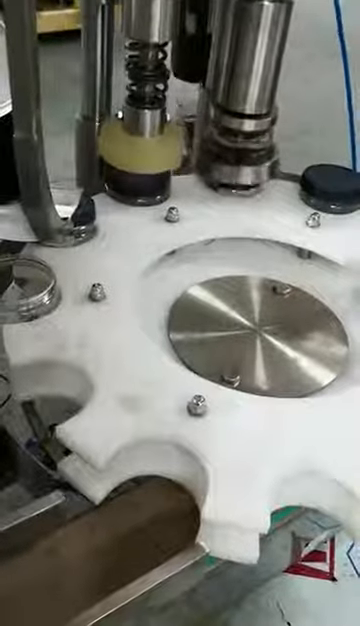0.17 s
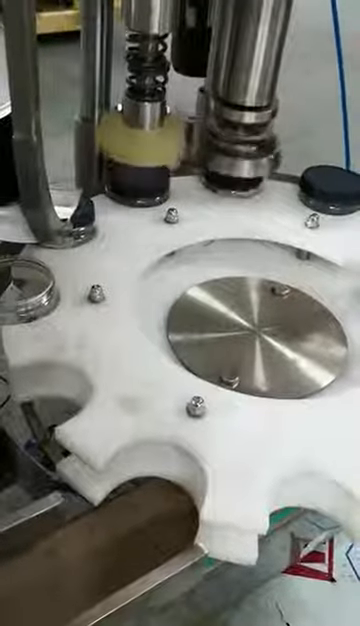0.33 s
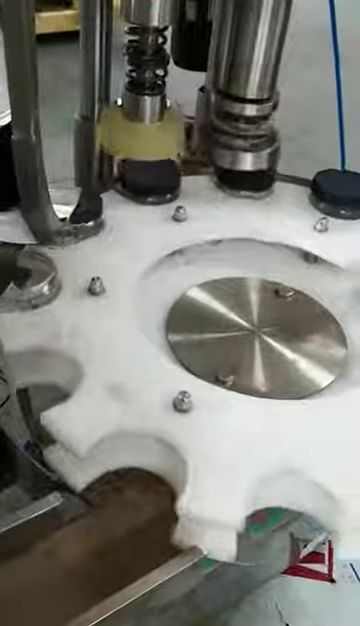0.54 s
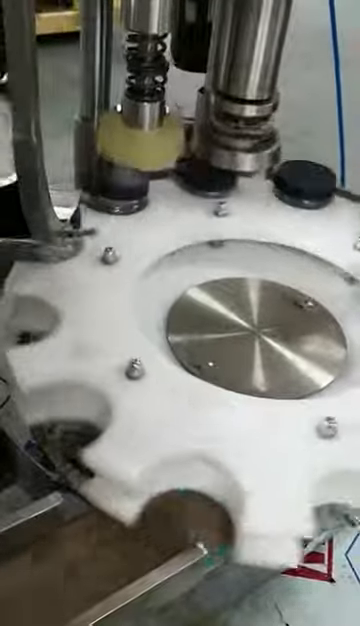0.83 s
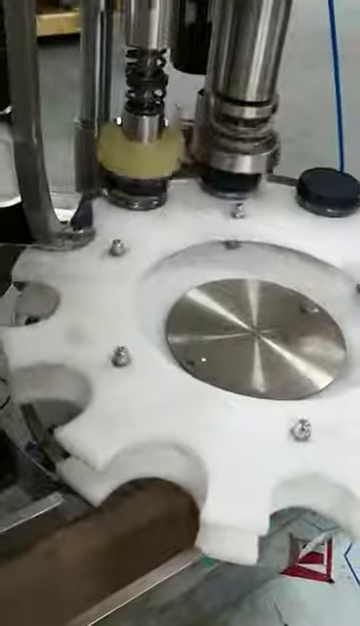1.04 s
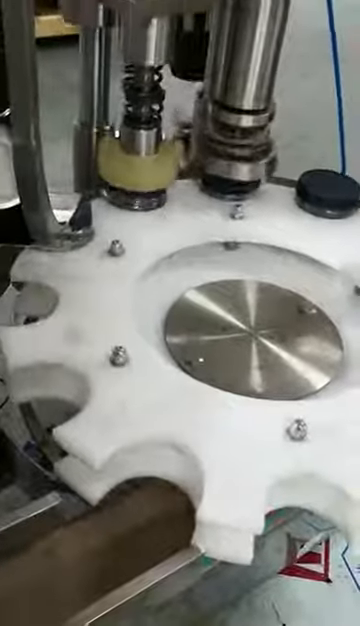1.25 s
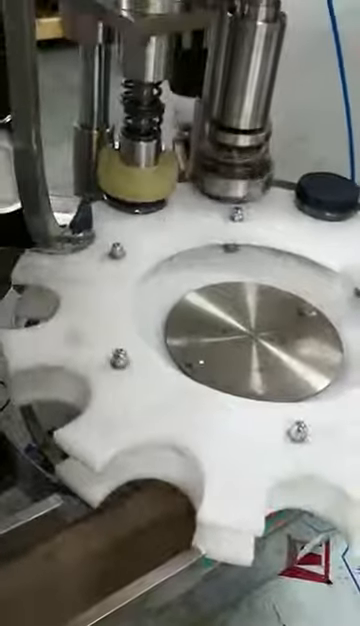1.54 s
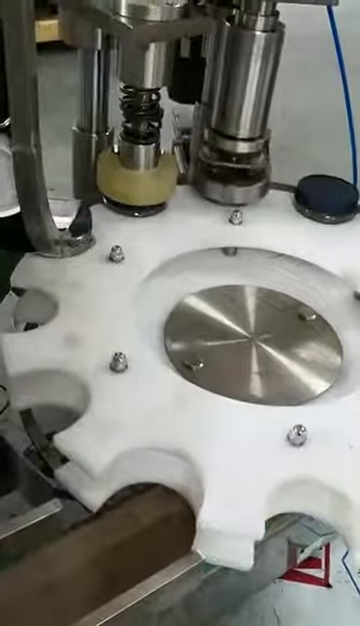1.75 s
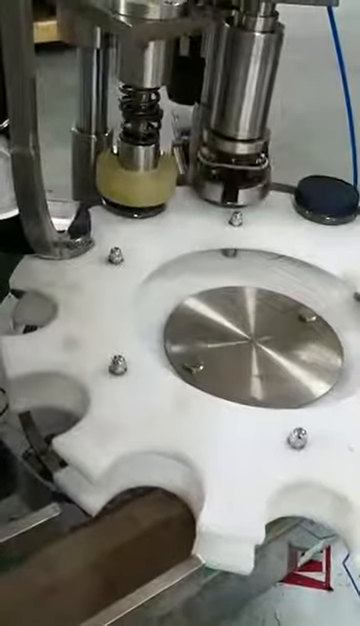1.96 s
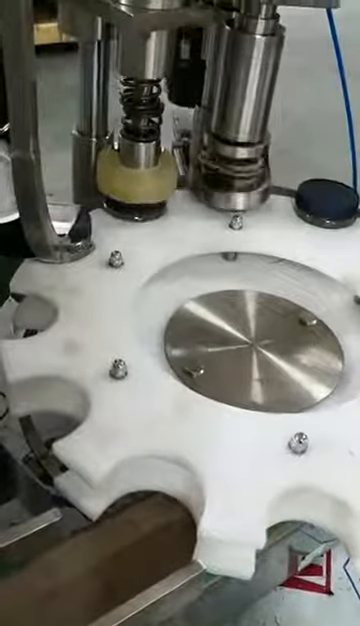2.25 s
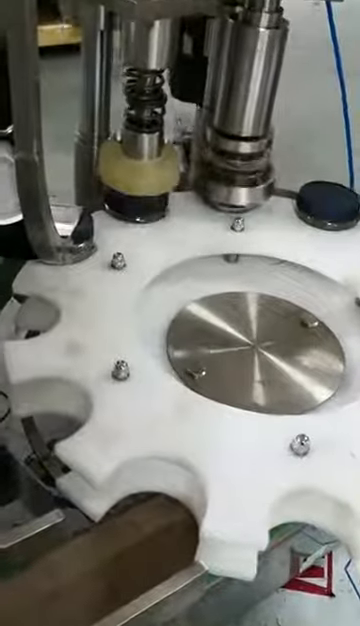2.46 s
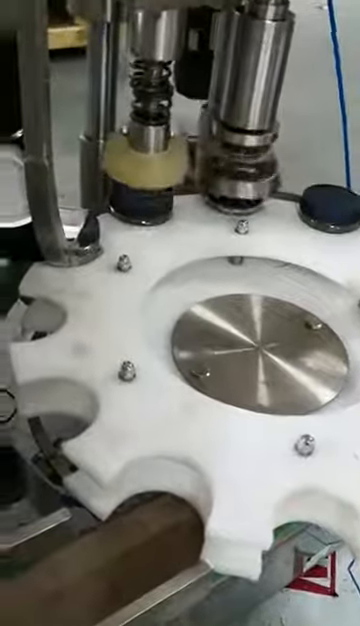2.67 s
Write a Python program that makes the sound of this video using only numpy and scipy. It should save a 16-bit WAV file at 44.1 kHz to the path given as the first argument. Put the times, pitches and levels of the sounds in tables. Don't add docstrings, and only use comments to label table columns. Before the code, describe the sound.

A capping machine runs through one cycle: plastic clatter, scraping wheel, sharp metal slam, air bursts

```python
import sys
import numpy as np
from scipy import signal
from scipy.fft import rfft, irfft
from scipy.io import wavfile
from scipy.ndimage import uniform_filter1d

SR = 44100
rng = np.random.default_rng(int(sys.argv[2]) if len(sys.argv) > 2 else 0)


def log_audio(samples):
    frames = np.atleast_2d(samples).T
    limited = np.clip(frames, -1, 1)
    pcm = np.round(limited * 32767).astype(np.int16)
    wavfile.write(sys.argv[1], SR, pcm)


def magnitude_from_level(level_db):
    exponent = np.asarray(level_db, float) / 20
    return 10 ** exponent


N = 123921


def evened(x):
    return x / np.sqrt(np.mean(x ** 2) + 1e-20)


def read(points, hz):
    f, value = np.transpose(points)
    return np.interp(np.log(hz + 1), np.log(f + 1), value)


def curve(points, outside=None):
    t, value = np.transpose(points)
    return np.interp(np.arange(N) / SR, t, value, outside, outside)


def add(mix, s, sound):
    part = mix[round(s * SR):][:len(sound)]
    part += sound[:len(part)]


def resonate(x, hz, width):
    turn = np.exp(2j * np.pi * hz * np.arange(x.shape[-1]) / SR)
    r = np.exp(-np.pi * width / SR)
    return 2 * (turn * signal.lfilter([1 - r], [1, -r], x / turn)).real


def ring(hz, db, t60, t):
    return magnitude_from_level(db - 60 * t / t60) * np.sin(2 * np.pi * hz * t)


def coloured(points):
    spectrum = rfft(rng.standard_normal(N))
    return evened(irfft(spectrum * magnitude_from_level(read(points, np.fft.rfftfreq(N, 1 / SR))), N))


# f/Hz, level/dB per Hz
ROAR_SPECTRUM = [(20, -19), (100, -11.5), (165, -10), (195, -2), (250, -14.5), (330, -6), (520, -18),
                 (1200, -16)]
# f/Hz, level/dB per Hz
HISS_SPECTRUM = [(1200, -5.5), (1500, -3), (1610, -6.5), (2070, 1), (2880, -4), (3800, -8.5), (4060, -5.5),
                 (4300, -12), (5270, -4.5), (7500, -7), (9750, -58)]
ROAR_DB, HISS_DB = -38, -34.5
ROAR_FOLLOWS = 0.23
# t/s, hiss level/dB
AIR_DRAW = [
    (0, 0),
    (.55, -1),
    (1.3, 2),
    (1.55, 2.5),
    (2, 2),
    (2.35, 0.5),
    (2.81, -1),
]
# f/Hz, coherence (0-1)
COHERENCE = [(60, .92), (200, .9), (420, .4), (800, .1), (1600, .4), (2700, .2), (4000, .35), (6000, .05)]
SHOP_LAG_S = .000635
# f/Hz, level/dB
PATCHINESS = [(150, 2), (600, 4.5), (1300, 3), (2500, 3), (4000, 2), (7000, 2.96)]


def shop():
    hop, size = 256, 1024
    frames, hz = N // hop + 9, np.fft.rfftfreq(size, 1 / SR)
    a, b, c, d, patches = rng.standard_normal((frames, 513, 5)).T
    patches = uniform_filter1d(patches, size=5, axis=0)
    patches = evened(uniform_filter1d(patches, size=6, axis=1))
    flicker = evened(uniform_filter1d(rng.standard_normal(frames), size=3))

    at = np.minimum(np.arange(-2, frames - 2).clip(0) * hop, N - 1)
    pull_db, draw_db = curve(MOTOR_PULL)[at], curve(AIR_DRAW)[at]
    low = hz < 1200
    roar = evened(low * magnitude_from_level(read(ROAR_SPECTRUM, hz)))[:, None]
    hiss = evened(~low * magnitude_from_level(read(HISS_SPECTRUM, hz)))[:, None]
    roar_gain = magnitude_from_level(ROAR_DB + ROAR_FOLLOWS * (pull_db - pull_db.mean()))
    shape = roar_gain * roar + magnitude_from_level(HISS_DB + draw_db) * hiss

    same = np.clip(read(COHERENCE, hz), 0, 1)[:, None]
    left = a + 1j * b
    lag = np.exp(-2j * np.pi * hz * SHOP_LAG_S * (hz > 350))[:, None]
    right = same * left * lag + np.sqrt(1 - same ** 2) * (c + 1j * d)
    drift = magnitude_from_level(read(PATCHINESS, hz)[:, None] * patches + 0.19 * flicker)
    z = np.array([left, right]) * shape * drift
    x = signal.istft(z, nperseg=size, noverlap=size - hop)[1][:, :N]
    return magnitude_from_level(2.5) * np.hypot(magnitude_from_level(ROAR_DB), magnitude_from_level(HISS_DB)) * evened(x)


# t/s, level/dB
MOTOR_PULL = [(0, -41.5), (.15, -42), (.63, -42.5), (.76, -37.5), (.83, -59), (1.0, -46.5), (1.2, -43),
              (1.38, -39.5), (1.6, -45.5), (1.71, -41.5), (2.15, -36), (2.38, -42), (2.6, -41.5),
              (2.81, -45)]
HUM_HZ, HUM_WIDTH = 200.5, 16
# t/s, level/dB, level of upper modes/dB
CAM_THUMPS = [(0.077, -16.5, -5), (0.106, -19, -16), (0.681, -36.5, 3), (1.2234, -19, 2.5),
              (1.238, -35, 13), (1.259, -28, 0.5), (1.294, -30.5, 7.5), (1.392, -33.5, 7.5),
              (1.429, -35, 9), (2.211, -16, -3), (2.254, -23, -9), (2.272, -34, 5), (2.444, -25.5, 3.5),
              (2.465, -19, -2), (2.5, -25.5, -3.5)]
# f/Hz, level/dB, t60/s
FRAME_MODES = [(210.5, -4, 0.35), (233.6, -1, 0.15), (270, -2.5, 0.16), (320.5, -3.5, 0.21),
               (346.4, -2.5, 0.042), (384, -6, 0.092)]


def frame():
    hum = resonate(resonate(rng.standard_normal(N), HUM_HZ, HUM_WIDTH), HUM_HZ, 31)
    steady = hum / np.sqrt(abs(uniform_filter1d(hum ** 2, size=3500)) + 1e-12)
    out = magnitude_from_level(curve(MOTOR_PULL)) * evened(steady)
    t = np.arange(.4 * SR) / SR
    detunes = rng.uniform(0.95, 1.01, (len(CAM_THUMPS), len(FRAME_MODES)))
    for (s, db, upper_db), detune in zip(CAM_THUMPS, detunes):
        modes = 0
        for k, ((hz, mode_db, t60), d) in enumerate(zip(FRAME_MODES, detune)):
            modes = modes + ring(hz * d, mode_db + upper_db * (k > 0), t60, t)
        add(out, s, magnitude_from_level(db - 1.5) * np.minimum(t / 0.0047, 1) * modes)
    return out


# t/s, level/dB, low mode f/Hz, high mode f/Hz, high mode level/dB
PLASTIC_KNOCKS = [(.096, -35, 873, 2350, 14), (.552, -29, 1415, 2320, 8), (.582, -26.5, 712, 2500, -5),
                  (.7215, -31, 1700, 2610, 1.5), (.729, -32, 1700, 2280, 15), (.7355, -28, 1700, 2330, 14),
                  (0.7624, -22, 1700, 2330, 13), (.769, -36, 1700, 2460, 13), (.785, -45, 1790, 3700, 17.5),
                  (.791, -34.5, 1800, 3760, 14), (0.801, -35, 1800, 3733, 21.5),
                  (0.813, -17.5, 1725, 2850, 5.5), (.819, -18.5, 2300, 2810, 4.5),
                  (0.8239, -13, 1794, 2800, -3.5), (1.2115, -21, 788, 2070, -4),
                  (1.2135, -16, 870, 2070, -1.5), (1.218, -15.5, 2400, 1630, -11.5),
                  (1.3079, -15, 704, 2014, -5), (1.3077, -28, 2440, 3620, -4.5),
                  (1.693, -20, 2300, 2775, -7), (1.7, -19.5, 726, 2220, 8), (1.409, -18, 1324, 2260, -4),
                  (1.412, -13, 2240, 3300, -4.5), (1.417, -20.5, 2310, 1450, 0),
                  (1.4221, -14, 2400, 3334, 2), (1.4265, -13.5, 3024, 5000, -7)]
KNOCK_RISE_S, KNOCK_T60 = .003, .03
ROUGH, HIGH_WIDTH = .4, 400
CRACK_DB, CRACK_HZ, CRACK_WIDTH = -6.5, 1700, 1600


def knocks():
    out, t = np.zeros(N), np.arange(2000) / SR
    shape = np.minimum(t / KNOCK_RISE_S, 1) ** 2 * magnitude_from_level(-60 * t / KNOCK_T60)
    noises = rng.standard_normal((len(PLASTIC_KNOCKS), len(t)))
    for (s, db, low_hz, high_hz, high_db), noise in zip(PLASTIC_KNOCKS, noises):
        hollow = np.sin(2 * np.pi * low_hz * t)
        hard = np.sin(2 * np.pi * high_hz * t) + ROUGH * evened(resonate(noise, high_hz, HIGH_WIDTH))
        crack = resonate(noise[::-1], CRACK_HZ, CRACK_WIDTH)
        crack = evened(resonate(crack, CRACK_HZ, CRACK_WIDTH))
        add(out, s, magnitude_from_level(db + 6.0) * shape * (hollow + magnitude_from_level(high_db) * hard + magnitude_from_level(CRACK_DB) * crack))
    return out


# t/s, level/dB
WHEEL_CREEP = [
    (.44, -38.5),
    (.5, -29.5),
    (.53, -37.5),
    (.555, -41.5),
    (.59, -30.5),
    (.62, -52),
]
# t/s, level/dB
WHEEL_INDEX = [
    (.7, -38),
    (.736, -24),
    (.756, -31),
    (.766, -25.5),
    (.784, -20),
    (.826, -12.5),
    (.832, -19),
    (.87, -27),
    (.95, -37),
]
# f/Hz, width/Hz, level/dB
WHEEL_BODY = [(673, 230, -6), (1453, 280, -7), (1750, 400, 4), (2180, 470, 4), (2400, 340, 3),
              (2680, 310, 1.5), (3070, 140, -12), (3700, 120, -5), (5940, 500, -3.5), (6250, 1300, -11),
              (7130, 560, -1.5)]


def wheel():
    size = magnitude_from_level(3 * np.minimum(rng.exponential(1, N), 3))
    happens = rng.random(N) < 7000 / SR
    slips = size * happens * rng.choice([-1., 1.], N)
    picks = rng.random((len(WHEEL_BODY), N)) < .4
    heard = .5 + 2.4 * rng.choice([-1., 1.], (2, N))
    body = 0
    for (hz, width, db), pick in zip(WHEEL_BODY, picks):
        resonance = resonate(resonate(slips * pick * heard, hz, width), hz, 2 * width)
        body = body + magnitude_from_level(db) * evened(resonance)
    motion = magnitude_from_level(curve(WHEEL_INDEX, outside=-84)) + magnitude_from_level(curve(WHEEL_CREEP, outside=-83))
    return motion * evened(body)


# peak t/s, rise/s, level/dB, t60/s
AIR_PUFFS = [
    (0.737, 0.011, -50.5, 0.043),
    (1.4265, .016, -15.5, 0.096),
    (1.686, .025, -24.5, 0.16),
    (2.206, 0.045, -26, 0.27),
    (2.287, 0.021, -36, 0.083),
    (2.449, 0.078, -33.5, 0.17),
]
# f/Hz, level/dB per Hz
AIR_SPECTRUM = [(240, -29), (400, -10), (877, -13), (1240, -2), (3260, -6.5), (7500, -6.5), (9750, -34.5),
                (16500, -120)]


def air():
    t = np.arange(N) / SR
    flow = 0
    for s, rise, db, t60 in AIR_PUFFS:
        flow = flow + magnitude_from_level(db + np.where(t < s, -20 * (s - t) / rise, -60 * (t - s) / t60))
    sputter = magnitude_from_level(1.5 * evened(uniform_filter1d(rng.standard_normal(N), size=90)))
    shared = coloured(AIR_SPECTRUM)
    jets = np.array([shared + 6.7 * coloured(AIR_SPECTRUM) for _ in "LR"])
    return flow * evened(sputter * jets)


# t/s, level/dB, treble level/dB
HEAD_SLAMS = [
    (1.3822, -32, 2),
    (1.3856, -2, -1.5),
    (1.3895, -24.5, -8.5),
    (1.3943, -20.5, 7.5),
    (1.3969, -18.5, 4.5),
    (1.404, -16, -3.5),
]
# f/Hz, level/dB, t60/s
HEAD_MODES = [(861, -6, .02), (1050, 1, .02), (1250, 3, .02), (1550, 0, .02), (2272, -1, .03),
              (3000, -5, .015), (4100, -2, .011), (4600, 0, .011), (5050, -2, .016), (5750, -5, .018),
              (6858, -7, .02), (7300, -9, .018)]


def slam():
    out, t = np.zeros(N), np.arange(4000) / SR
    for (s, db, treble_db), draw in zip(HEAD_SLAMS, rng.standard_normal((len(HEAD_SLAMS), len(t)))):
        modes = 0
        for (hz, mode_db, t60), d in zip(HEAD_MODES, draw):
            modes = modes + ring(hz * (1 + 0.025 * d), mode_db + treble_db * hz / 4000, t60, t)
        burst = magnitude_from_level(1 - 60 * t / .008) * draw
        add(out, s, magnitude_from_level(db - 7) * np.minimum(t / .0005, 1) * (modes + burst))
    return out


def push():
    peak_s, width_s, db = 1.4295, 0.0018, -11.5
    return -magnitude_from_level(db) * np.exp(-.5 * ((np.arange(N) / SR - peak_s) / width_s) ** 2)


# t/s, whir level/dB over SPIN_DB
CHUCK_SPIN = [
    (1.825, -18),
    (1.844, 7),
    (1.95, -4),
    (1.974, 8.5),
    (2.076, -2),
    (2.104, 10.5),
    (2.18, -6),
    (2.216, 1),
    (2.25, -8),
]
SPIN_HZ, SPIN_WIDTH, SPIN_DB = 850, 70, -40.5
# t/s, length/s, level/dB, f/Hz
CHUCK_SQUEAKS = [
    (1.907, 0.013, -29.5, 5330),
    (1.949, 0.01, -29, 5250),
    (2.018, 0.013, -35, 5400),
    (2.04, .018, -28, 5000),
    (2.063, .01, -36, 5050),
    (2.087, 0.008, -30, 5200),
    (2.176, 0.018, -29, 5100),
]


def chuck():
    t = np.arange(N) / SR
    whir = resonate(rng.standard_normal(N), SPIN_HZ, SPIN_WIDTH)
    whir = evened(resonate(whir, SPIN_HZ, 160))
    steady = whir / np.sqrt(abs(uniform_filter1d(whir ** 2, size=1200)) + 1e-12)
    out = magnitude_from_level(SPIN_DB + curve(CHUCK_SPIN, outside=-60)) * steady
    t = t[:3000]
    noises = rng.standard_normal((len(CHUCK_SQUEAKS), len(t)))
    for (s, length, db, hz), noise in zip(CHUCK_SQUEAKS, noises):
        u = t / length
        wobble = np.cumsum(evened(uniform_filter1d(noise, size=100))) * 70 / SR
        tone = np.sin(2 * np.pi * (hz * t + wobble))
        add(out, s, magnitude_from_level(db + 4.5) * 2 * u * np.exp(-2 * u * u) * tone)
    return out


def ports(x, lean, lag_s=0):
    hz = np.fft.rfftfreq(N, 1 / SR)
    half = magnitude_from_level(read(lean, hz) / 2) * np.exp(1j * np.pi * hz * lag_s)
    return irfft(rfft(x) * np.array([half, 1 / half]), N)


# f/Hz, t60/s
SHOP_T60 = [(200, 0.56), (1500, 1), (7000, 0.15)]


def room(x):
    taps = np.zeros((2, SR // 2))
    at = np.arange(200, SR // 2 - 40, 20)
    jittered = at + rng.integers(0, 20, (2, len(at)))
    np.put_along_axis(taps, jittered, rng.choice([-1., 1.], (2, len(at))), 1)
    hz, t, z = signal.stft(taps, SR, nperseg=256)
    decay = magnitude_from_level(-60 * t / read(SHOP_T60, hz)[:, None])
    tail = signal.istft(z * decay, SR, nperseg=256)[1]
    return signal.fftconvolve(x[None], tail / np.linalg.norm(tail[0]), axes=1)[:, :N]


def scatter(x):
    t60, t = .014, np.arange(1200) / SR
    taps = rng.standard_normal((2, len(t))) * (rng.random((2, len(t))) < .1)
    taps = taps * magnitude_from_level(-60 * t / t60)
    return signal.fftconvolve(x, taps / np.linalg.norm(taps, axis=1)[:, None], axes=1)[:, :N]


# f/Hz, left-right level/dB
NEAR_SHADOW = [(1000, -3.5), (2200, 3), (3300, -5), (5000, 0)]
NEAR_LAG_S, PARTS_DB, SHOP_DB = -.00019, -6, -15


def scene():
    hits, head = knocks() + chuck(), slam()
    near = hits + magnitude_from_level(PARTS_DB) * scatter(hits[None] + .5 * head) + air() + wheel()
    direct = ports(near, NEAR_SHADOW, NEAR_LAG_S) + ports(head, NEAR_SHADOW, 0)
    reverberant = magnitude_from_level(SHOP_DB) * room(near[0] + head)
    return shop() + direct + reverberant + ports(frame() + push(), [(200, -1)], 0.00022)


def band_limit(x):
    return signal.sosfilt(signal.butter(12, 8900, fs=SR, output="sos"), x)


# f/Hz, left-right level/dB
PORT_LEAN = [(300, 0), (600, -2.5), (900, -1.5), (2500, 2), (4800, -3.5), (6000, -5.5), (7450, -18),
             (7900, -12)]
# from t/s, to t/s
TOP_OPEN = [
    (1.378, 1.402),
    (1.42, 1.458),
    (1.911, 1.92),
]
EDGE_HZ, TOP_HZ, SHELF_DB = 7520, 8270, -5


def record(dry):
    dry, t = ports(dry, PORT_LEAN), np.arange(N) / SR
    power_db = 10 * np.log10(abs(uniform_filter1d((dry ** 2).mean(0), size=600)) + 1e-12)
    held_db = np.maximum.accumulate(power_db + 40 * t) - 40 * t
    over_db = np.maximum(held_db + 19.5, 0)
    x = dry / magnitude_from_level(.15 * uniform_filter1d(over_db, size=200))
    x = x / (1 + (x / 1.05) ** 4) ** .25

    def cut(hz):
        taps = signal.firwin(1023, hz, window=("kaiser", 9), fs=SR)
        return signal.oaconvolve(x, taps[None], "same")

    gate = uniform_filter1d(sum(1. * (t > a) * (t < b) for a, b in TOP_OPEN), size=150)
    main = cut(EDGE_HZ)
    return band_limit(main + magnitude_from_level(SHELF_DB) * gate * (cut(TOP_HZ) - main))


dry = scene()
out = record(dry)
log_audio(out)
```